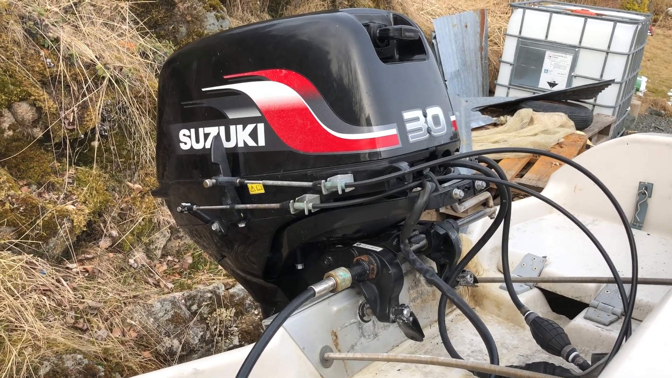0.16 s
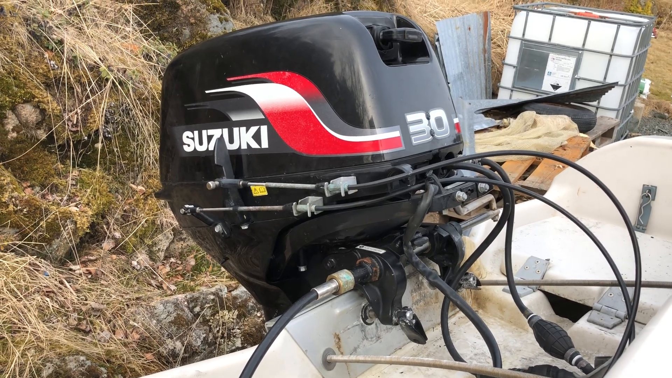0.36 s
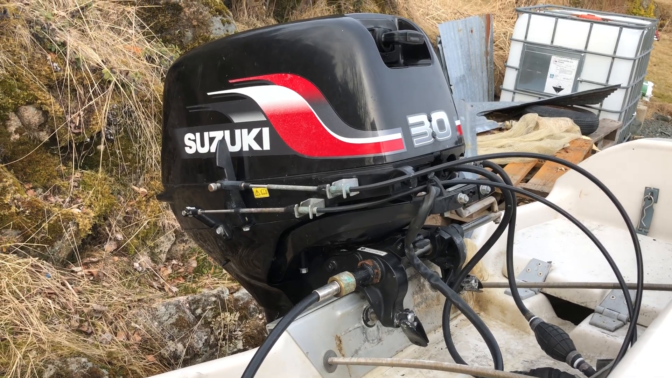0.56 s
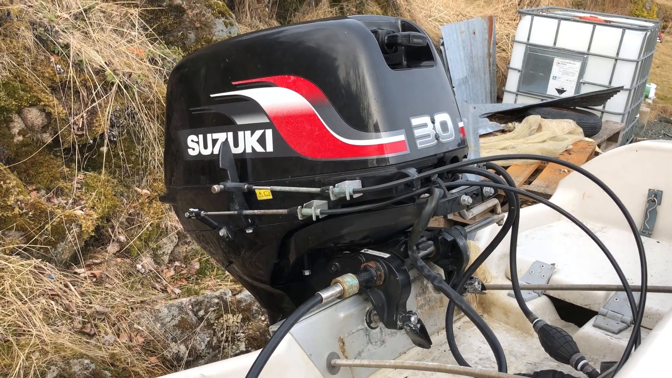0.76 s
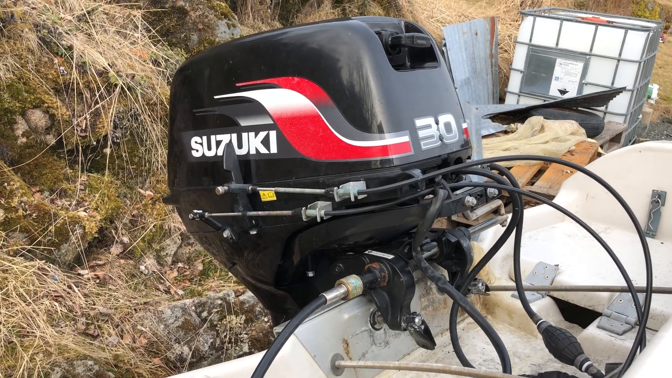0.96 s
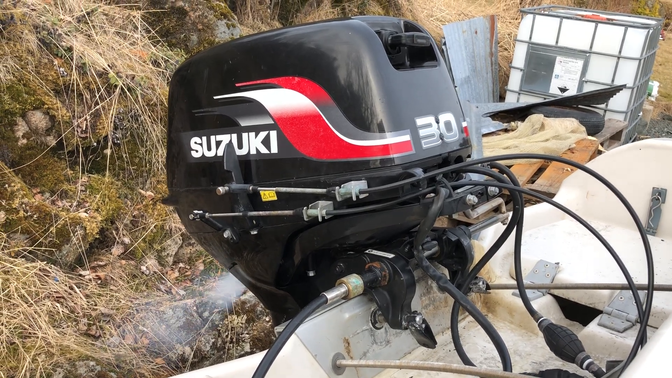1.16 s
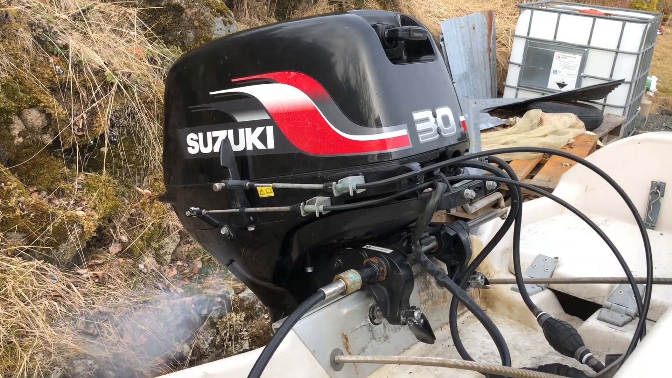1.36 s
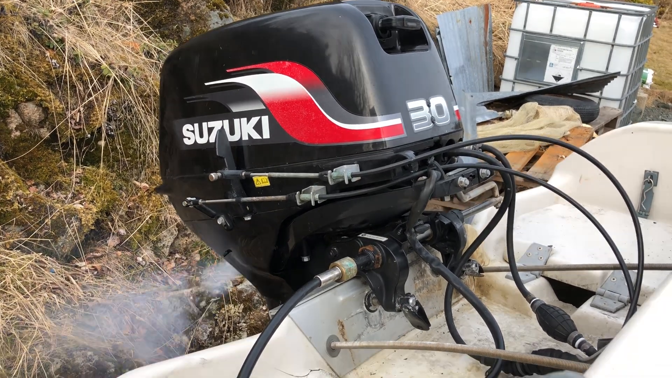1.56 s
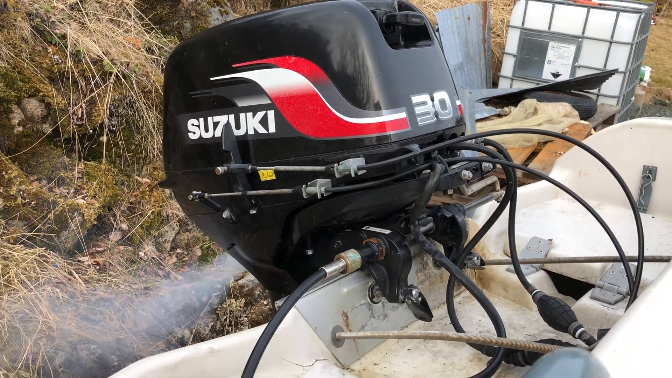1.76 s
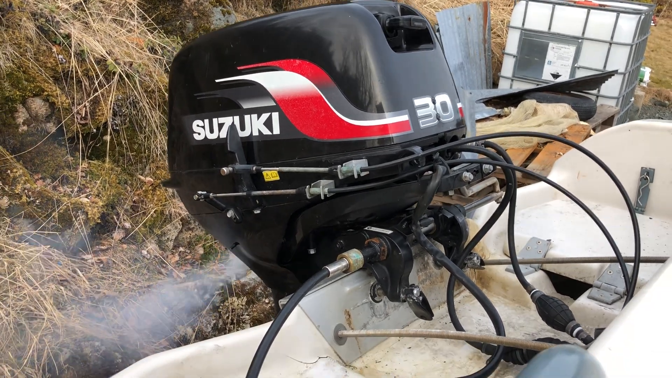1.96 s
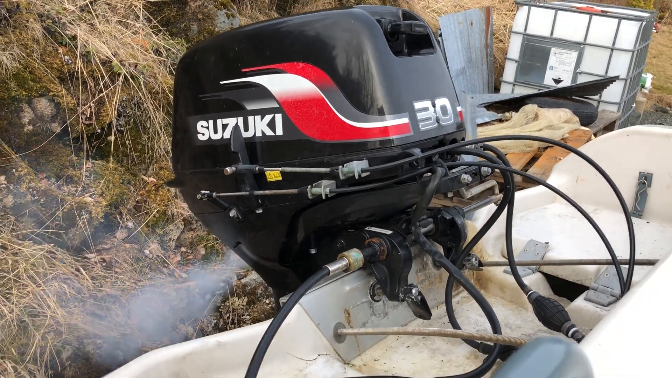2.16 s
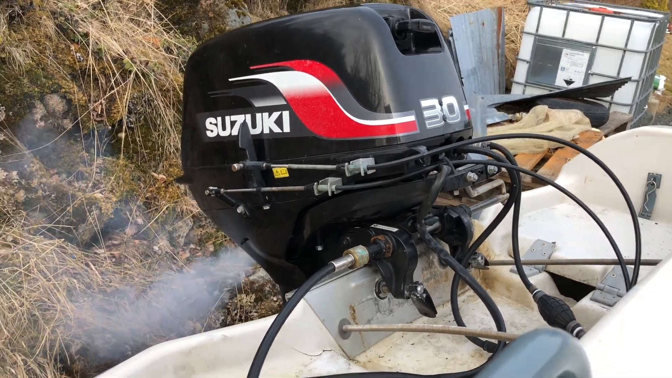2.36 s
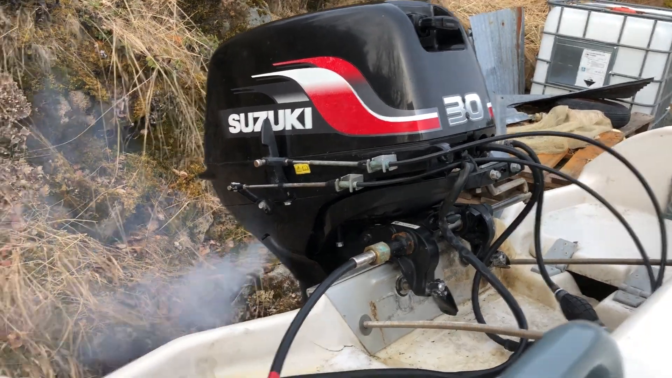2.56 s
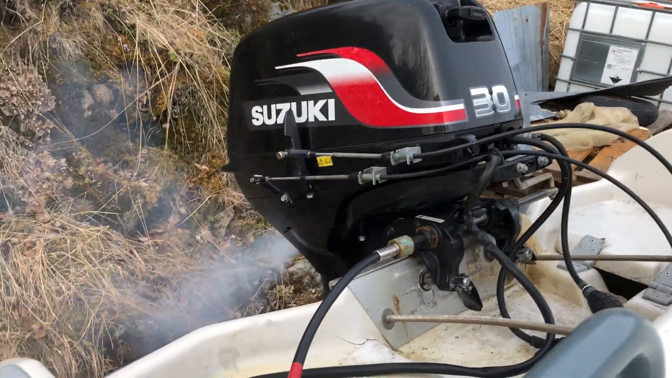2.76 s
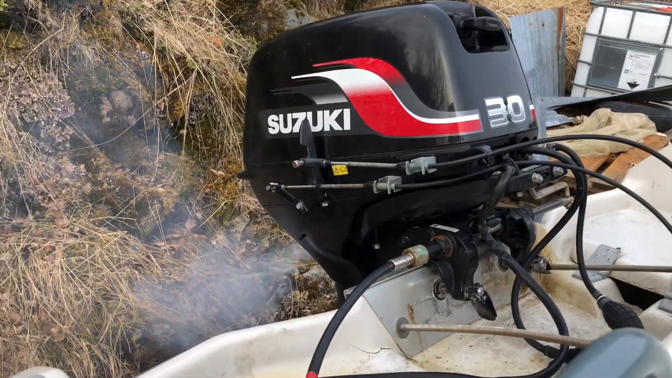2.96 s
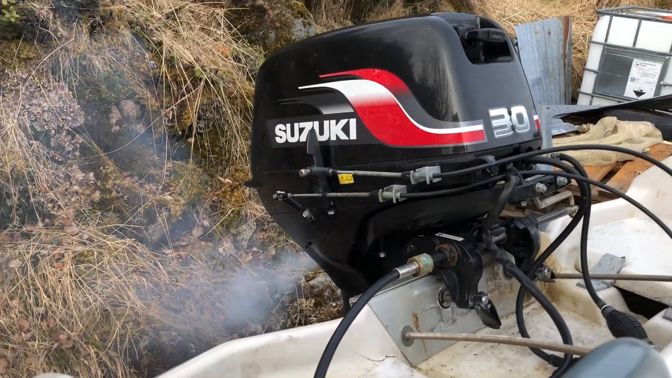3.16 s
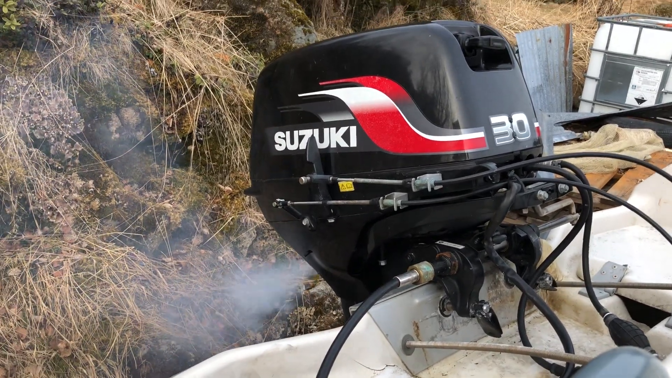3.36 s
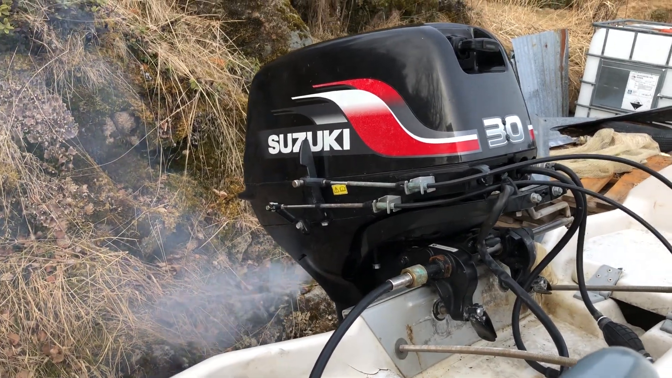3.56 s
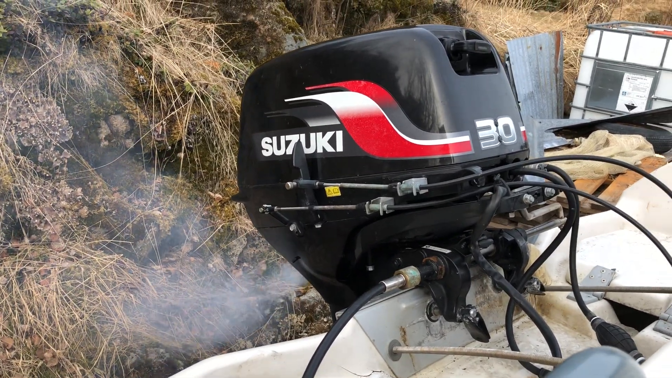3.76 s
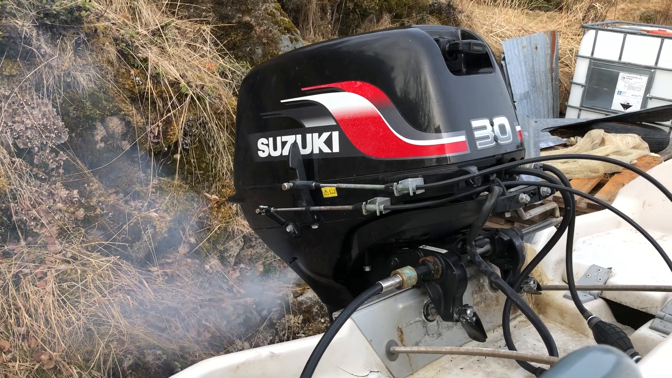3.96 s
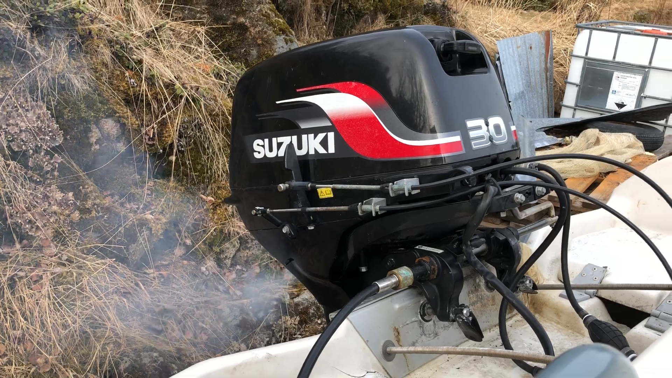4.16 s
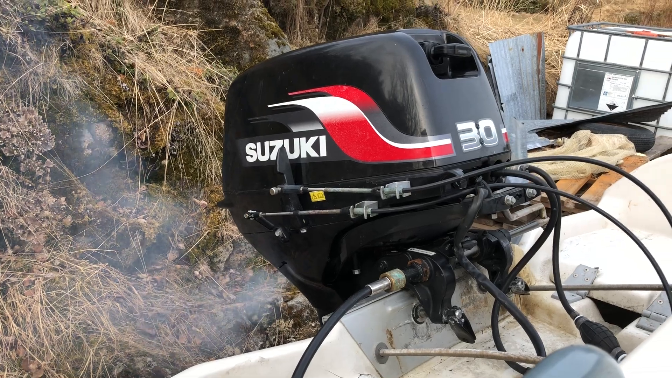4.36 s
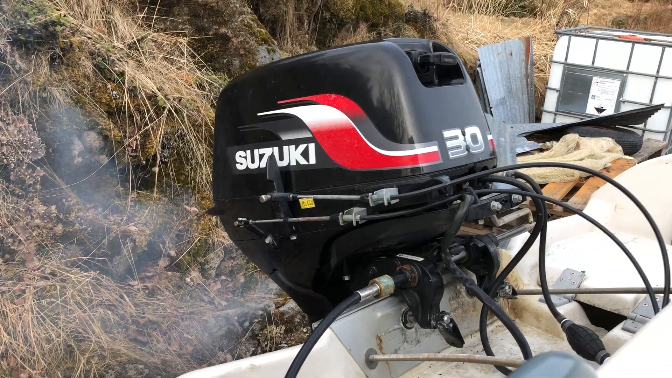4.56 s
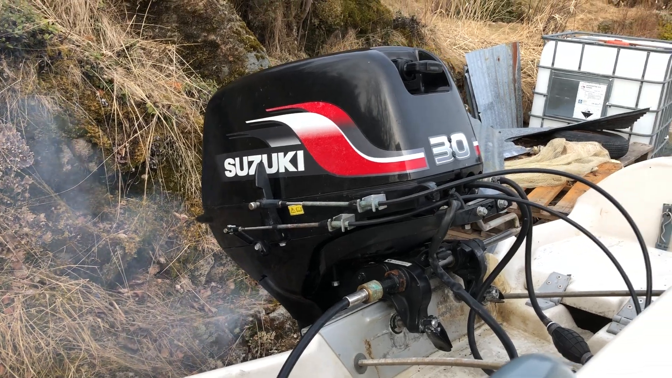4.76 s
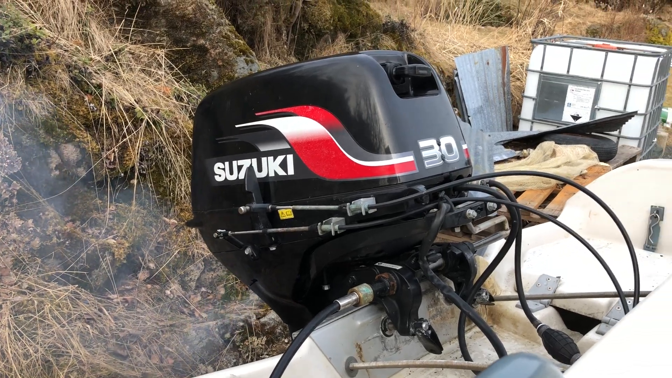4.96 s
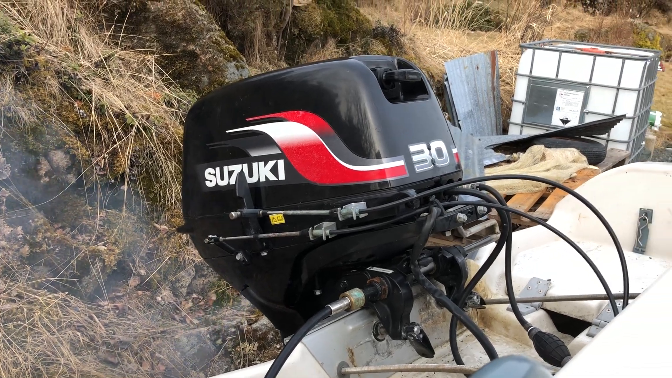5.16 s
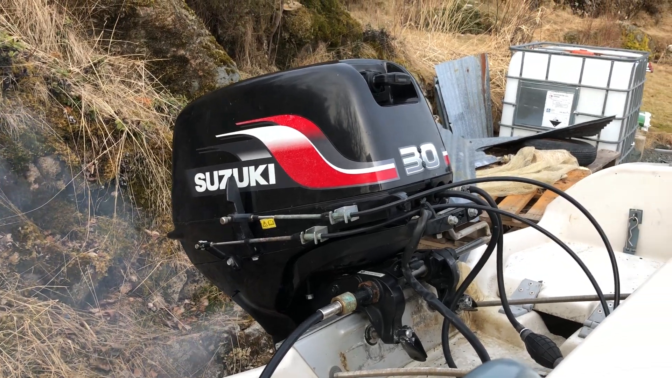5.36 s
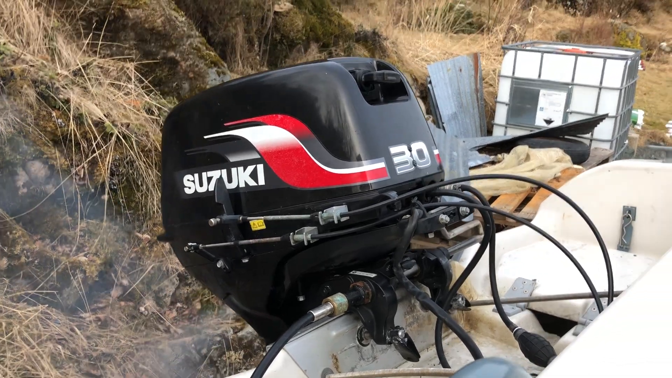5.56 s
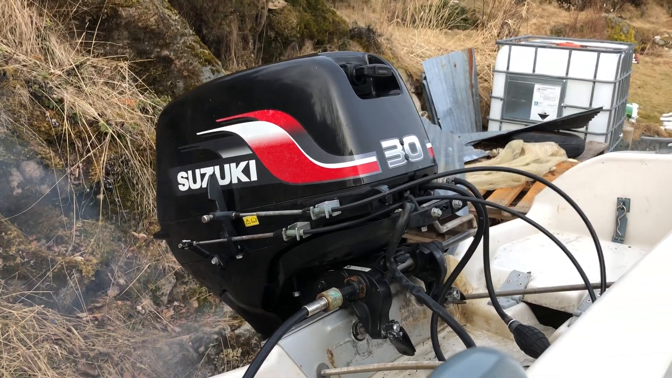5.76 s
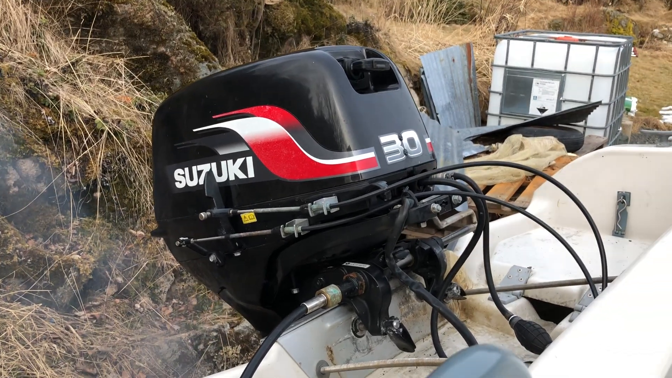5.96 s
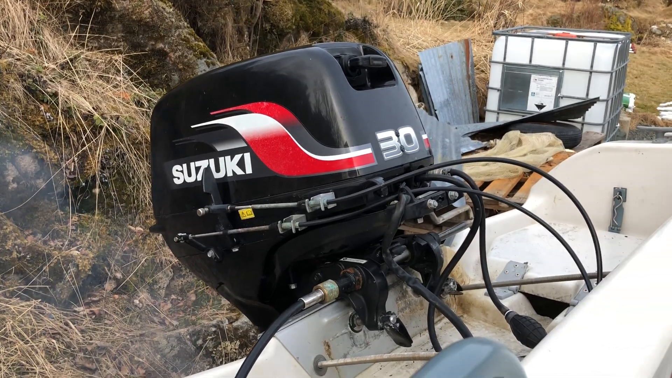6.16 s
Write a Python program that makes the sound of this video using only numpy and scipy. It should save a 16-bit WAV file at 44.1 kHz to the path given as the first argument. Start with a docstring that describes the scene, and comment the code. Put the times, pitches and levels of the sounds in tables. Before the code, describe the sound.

Close and nearly dry outdoors: rapid grinding starter strokes, about fourteen a second, the first one laboured. Then an uneven two-cylinder engine bursts in, clattering its casing and puffing through an open exhaust leg with a hollow tone near 210 hertz. It settles into weaker, steadier beats, misfires, slows with a few loose knocks and stops. A faint rising note follows in the near silence; no water, only soft air noise.

```python
"""An outboard motor on land fires unevenly: each firing rattles the casing and booms in the open exhaust leg.
First the starter grinds it through its compression strokes, gear teeth clacking and whining, until it catches.
Flywheel and gears hiss, slack parts knock, gas rumbles and pulses bounce along the leg. Later it misses
every other turn, slows and stalls with a faint ring of the flywheel; a faint rising note follows.
Hull and rock bank scatter the metal sounds briefly, over a quiet bed of air noise."""
import sys
import numpy as np
from scipy import signal
from scipy.fft import rfft, irfft, next_fast_len
from scipy.io import wavfile
from scipy.ndimage import uniform_filter1d, map_coordinates

SR = 44100
rng = np.random.default_rng(int(sys.argv[2]) if len(sys.argv) > 2 else 0)


def inscribe(sig):
    """Save sig as 16-bit PCM at rate SR to the path in sys.argv[1].

    A 1-D sig is mono; a 2-D sig holds one channel per row.
    Samples are clipped to [-1, 1] before scaling.
    """
    pcm = np.round(np.clip(np.atleast_2d(sig).T, -1, 1) * 32767)
    wavfile.write(sys.argv[1], SR, pcm.astype(np.int16))


N = 272979
TIME = np.arange(N) / SR
TOP_HZ = 15950  # band limit

# All levels are relative, before each source's own gain.
# air bed spectrum: freq_hz, density_db
AIR_SPECTRUM = [(18, -47.5), (30, -10), (114, 7.5), (294, -18), (484, -9.5), (582, -10), (2880, -25),
                (15900, -30.5)]

# ringing of the slowing flywheel: freq_hz, level_db
COAST_PARTIALS = [(828, -2), (990, -12), (539, -12.5), (1430, -16), (2182, -13), (4183, -21)]
# its level: time_s, level_db
COAST_LEVEL = [(5.2, -59), (5.5, -49.5), (5.85, -45.5), (5.93, -51), (6.03, -88)]

# hard knocks of slack parts: start_s, ring_db, ring_hz, crack_db
SLACK_KNOCKS = [(1.133, -22, 1830, -20.5), (2.578, -21, 1470, -28.5), (2.585, -17, 1443, -33),
                (2.617, -19, 5120, -30), (2.752, -22, 5070, -44), (5.256, -39, 3220, -34.5),
                (5.323, -30, 3006, -30.5), (5.688, -29, 2880, -29), (5.815, -35, 1460, -45.5)]
# knock crack spectrum: freq_hz, density_db
CRACK_SPECTRUM = [(300, -16), (1400, 0.5), (2700, 4.5), (5000, -1.5), (8000, -10.5), (16000, -31.5)]

# load over one compression stroke: stroke_share, mesh_hz, whine_db, grind_db
STROKE_LOAD = [(0, 570, -23, -0.5), (.2, 548, -11, 1), (.35, 524, -1.5, -0.5), (.46, 486, 3.5, 3.5),
               (.54, 440, -3.5, 1.5), (.66, 440, -16.5, -1.5), (.85, 549.7, -33, -2.5), (1, 570, -31.5, -4)]
# whine partials: mesh_multiple, level_db
MESH_PARTIALS = [(1, -3.5), (2, 0.5), (3, -10.5), (4, -14), (6, -8.5), (8, -10.5), (12, -18)]
# starter drive: time_s, drive_db
STARTER_DRIVE = [(0, -1), (.15, -1.5), (1.09, -1.5), (1.15, 2), (1.2, -3.5), (1.3, -85.5)]
# pinion and flywheel resonances: freq_hz, width_hz, lift_db
FLYWHEEL_MODES = [(545, 16.8, 10), (1322, 20, 9.5), (1736, 28, 12), (2575, 90, 9), (3266, 58, 11),
                  (3900, 60, 6), (4250, 70, 8), (6080, 50, 10), (6540, 113, 15), (8490, 70, 14.5),
                  (9330, 70, 14), (10700, 140, 12.5)]
# tooth scrape spectrum: freq_hz, density_db
GRIND_SPECTRUM = [(25, -38), (45, -10), (90, -10.5), (160, -6), (240, -1.5), (420, -7), (560, -8),
                  (800, -9), (1100, -13.5), (2200, -17), (3300, -17), (5100, -24), (6500, -25.5),
                  (11000, -39.5), (15900, -43.5)]
# tooth strike and clack spectrum: freq_hz, density_db
CLACK_SPECTRUM = [(300, -6), (1200, -20), (2400, -3.5), (3300, 2), (4200, -2.5), (5000, -4.5),
                  (6500, -16.5), (10000, -25.5), (16000, -39.5)]
# pinion ring: freq_hz, level_db, t60_s
PINION_MODES = [(3344, -5, 0.085), (3860, -10, 0.075), (2585, -14, 0.051), (681, -9, 0.061),
                (6100, -11.5, 0.0485), (7000, -15.5, 0.025), (9340, -18, 0.074)]
# spectrum of air squeezed by the piston: freq_hz, density_db
HISS_SPECTRUM = [(1000, -26), (5000, -2), (9000, 0.5), (16000, -8.5)]
# starter motor hum: freq_hz, level_db
ARMATURE_HUM = [(546, -41.5), (1030, -55), (1708, -53), (6471, -54)]

# spinning parts: time_s, level_db
WHIR_LEVEL = [(1.0, -65), (1.075, -34), (2.6, -33), (3.2, -36), (4.5, -37), (5.4, -40.5), (5.65, -42),
              (5.87, -54.5), (6.05, -84)]
# spinning parts spectrum: freq_hz, density_db
SPIN_SPECTRUM = [(100, -25.5), (400, -2), (760, -8.5), (1300, -5), (2800, -5.5), (4600, -13.5),
                 (6500, -5.5), (7300, -18.5), (10400, -10.5), (11500, -22), (16000, -18)]
# block and cowling resonances: freq_hz, width_hz, lift_db
CASING_MODES = [(435, 78.5, -0.5), (670, 17.4, 7), (858, 64.5, 9), (969, 87, 6.5), (1371, 120, 5.5),
                (1912, 42.4, 2.5), (2060, 32, -4.5), (2168, 60, 3.5), (2330, 61.7, -0.5), (2673, 28.9, 1.5),
                (3210, 39, 2), (4270, 15, 3.5), (5140, 67, 4.5), (5500, 140, 1.5), (5990, 38, 4),
                (6440, 33.4, 3.5), (6750, 16, 2.5), (9540, 240, -1.5)]
# clatter spectrum: freq_hz, density_db
CLATTER_SPECTRUM = [(100, -28), (300, 1.5), (500, 6), (760, -10), (1200, -11.5), (2300, 0), (3700, -6),
                    (5500, -4), (7200, -11), (10000, -10), (11800, -16.5), (16000, -17.5)]

# gas flow: time_s, rumble_db, hollow_db
GAS_FLOW = [(1.15, -28, -29.5), (2.0, -27.5, -28), (2.9, -27, -28), (3.5, -35.5, -36.5),
            (4.2, -31.5, -35.5), (5.3, -38, -49), (5.65, -42.5, -55), (5.8, -45, -43), (6.02, -66, -73),
            (6.19, -78, -70.5)]
# gas rumble spectrum: freq_hz, density_db
RUMBLE_SPECTRUM = [(15, -36), (28, -17), (43, -8), (80, -2), (150, -3.5), (250, -5), (400, -26.5),
                   (1000, -78)]
# hollow rush spectrum: freq_hz, density_db
HOLLOW_SPECTRUM = [(150, -3), (270, -3), (360, -6.5), (430, -5), (490, 0.5), (560, -11.5), (720, -15),
                   (1500, -41.5)]
# leg hum between puffs: time_s, level_db
LEG_HUM = [(1.1, -42), (2.9, -28), (3.3, -35.5), (4.2, -32), (5.28, -37.5), (5.42, -29.5), (5.65, -40),
           (5.85, -51), (6.05, -76)]
# low sway of leg and transom: freq_hz, level_db, t60_s
SWAY_MODES = [(45, -5.5, 0.18), (65.6, -6, .18), (84, -3.5, .16), (118.8, -6, .14), (146, -1, 0.11),
              (284, -5.5, .09)]

# uneven firings, catch to last kick: start_s, clatter_db, boom_db, puff_rise_s, boom_hz (before drift)
FIRING_EVENTS = [(1.087, -26, -45, .02, 214), (1.119, -18.5, -23, .036, 215),
                 (1.181, -27.5, -9.5, 0.031, 218.8), (1.245, -46.5, -12, 0.03, 207.4),
                 (1.275, -24, -11.5, 0.038, 204), (1.388, -22, -9.5, 0.038, 215.5),
                 (1.479, -28, -11.5, 0.024, 206.5), (1.557, -21, -16.5, .035, 226),
                 (1.699, -22, -17.5, 0.059, 209.7), (1.807, -25.5, -19, 0.023, 210.6),
                 (1.875, -20, -13.5, 0.026, 215), (1.988, -21.5, -11.5, 0.041, 205),
                 (2.072, -26.5, -13, 0.015, 214.6), (2.16, -21.5, -10.5, 0.043, 203.9),
                 (2.244, -27, -8.5, 0.02, 210.8), (2.304, -24, -14, 0.032, 204),
                 (2.372, -31.5, -18.5, 0.016, 204.8), (2.394, -28.5, -16, 0.039, 213.2),
                 (2.479, -24.5, -11.5, 0.041, 200.4), (2.546, -36, -12.5, 0.02, 210.7),
                 (2.613, -25.5, -11.5, 0.021, 197.3), (2.678, -34, -34, 0.029, 204.1),
                 (2.749, -22.5, -12, 0.03, 209), (2.815, -34.5, -14.5, .021, 200),
                 (2.898, -22, -9, 0.034, 215.5), (2.958, -36, -15.5, .024, 202),
                 (2.992, -26, -10.5, 0.037, 210.6), (3.093, -25, -18.5, 0.032, 205.8),
                 (3.207, -25, -17.5, 0.029, 215), (3.323, -25, -19.5, 0.028, 208),
                 (3.443, -26, -18, 0.026, 208.8), (3.506, -40.5, -32, .026, 210),
                 (3.565, -26, -18.5, .027, 204), (3.688, -25, -17.5, 0.027, 208),
                 (3.75, -35.5, -26, .022, 211.2), (3.812, -27.5, -15.5, 0.021, 200),
                 (3.875, -36, -19.5, .019, 207), (3.937, -28.5, -16.5, 0.019, 202.8),
                 (4, -35.5, -16, 0.014, 203), (4.06, -29.5, -21.5, .022, 195),
                 (4.124, -31, -16.5, 0.021, 206.5), (4.188, -30, -18.5, .025, 203),
                 (4.254, -30.5, -21, 0.021, 208), (4.318, -33, -27, 0.018, 215),
                 (4.388, -31.5, -20.5, 0.022, 222), (4.458, -31.5, -22.5, 0.026, 207),
                 (4.528, -31, -19.5, 0.03, 205), (4.605, -35.5, -44, 0.023, 204),
                 (4.683, -29, -28, .024, 208), (4.76, -32.5, -32, .022, 200),
                 (4.846, -30.5, -28, .028, 199.3), (4.931, -31.5, -27.5, 0.024, 197.2),
                 (5.02, -32, -26.5, 0.026, 202.5), (5.11, -32, -29, 0.027, 195),
                 (5.207, -35, -28.5, 0.033, 199.6), (5.318, -33.5, -27, .034, 214),
                 (5.44, -32, -30, .02, 213), (5.561, -33, -32, 0.022, 214.2), (5.688, -39, -49, .026, 215),
                 (5.835, -49.5, -50, 0.017, 253.3)]
# weak strokes between firings: time_s, clatter_db, boom_db
WEAK_LEVELS = [(1.2, -48, -20), (2.5, -45, -25), (3.3, -38.5, -37), (4.7, -38, -46), (5.05, -39.5, -36),
               (5.26, -39, -34), (5.38, -36.5, -24.5), (5.5, -36.5, -25), (5.63, -40, -25.5),
               (5.76, -52.5, -39)]
# rattles lengthen as the crank slows: time_s, stretch_ratio
RATTLE_STRETCH = [(3.0, 1.1), (3.3, 0.99), (4.25, 1.206), (5.05, 1.49), (5.4, 1.67), (5.7, 1.9)]

# cranking: stroke time at full speed, extra time taken at the slow start
CRANK_START_S, STROKE_S, LABOUR_S = 0.0016, 0.0711, 0.028
# gear clack: at full speed, added while slow, random spread
CLACK_DB, SLOW_CLACK_DB, CLACK_VARY_DB = -13.5, -3, 1.3
# rattle length before stretch; second rattle's delay, its level at the reference push, rise with a longer push
RATTLE_S, SECOND_S, SECOND_DB, SECOND_DB_PER_S = 0.018, 0.023, -10.5, 601
# reference puff rise time; puff half length as a share of its own rise time
PUFF_S, PUFF_WIDTH = 0.028, 0.535


def amp(db):
    """dB to amplitude."""
    return 10 ** (np.asarray(db) / 20)


def unit(x):
    """Scale to RMS 1."""
    return x / np.sqrt(np.mean(x ** 2) + 1e-20)


def curves(rows, at=TIME):
    """Each column after the first, joined by straight lines."""
    s, *cols = np.transpose(rows)
    return [np.interp(at, s, c) for c in cols]


def wobble(rate_hz):
    """Smooth random curve, rate_hz knots a second."""
    knots = rng.standard_normal(int(N * rate_hz / SR) + 4)
    fine = np.linspace(0, len(knots) - 1, 6 * len(knots))
    return np.interp(TIME * rate_hz, fine, map_coordinates(knots, [fine]))


def turning(hz):
    """Phase of a moving pitch."""
    return 2 * np.pi * np.cumsum(hz) / SR


def body(x, spectrum, modes=(), size=8192):
    """Minimum-phase filter of energy 1: a broad spectrum lifted by resonances."""
    hz = np.fft.rfftfreq(size, 1 / SR)
    f, level = np.transpose(spectrum)
    db = np.interp(np.log(hz + 1), np.log(f + 1), level)
    for centre, width, lift in modes:
        db = db + lift / (1 + ((hz - centre) / width) ** 2)
    # folding the cepstrum makes the response causal
    cepstrum = irfft(np.log(amp(db) + 1e-6))
    cepstrum[1:size // 2] *= 2
    cepstrum[size // 2 + 1:] = 0
    response = irfft(np.exp(rfft(cepstrum)))
    return signal.fftconvolve(x, response / np.linalg.norm(response))[:N]


def grit(rate_hz, share):
    """Random metal contacts over noise; share is the contacts' part of the power."""
    hits = rng.random(N) < rate_hz / SR
    contacts = hits * rng.choice([-1, 1], N) * (.5 + rng.random(N))
    share = np.clip(share, 0, 1)
    return np.sqrt(share) * unit(contacts) + np.sqrt(1 - share) * rng.standard_normal(N)


def ragged(x, depth_db, size=4):
    """Each contact wakes other partials: short patches of the spectrum stand out or drop away."""
    z = signal.stft(x, nperseg=256)[2]
    field = rng.standard_normal(z.shape)
    for axis in (0, 1):
        field = uniform_filter1d(field, size, axis)
    patches = unit(amp(depth_db * unit(field)))
    return signal.istft(z * patches, nperseg=256)[1][:N]


def place(shape, s):
    """Silence with the shape starting at s."""
    return np.pad(shape, (max(round(s * SR), 0), N))[:N]


def burst(s, length_s, attack_s):
    """A quick rise at s, a short hold and a fall."""
    u = TIME[:SR // 4]
    rise = 1 - np.exp(-u / attack_s)
    return place(rise * np.exp(-np.minimum(u / length_s, 10) ** 2), s)


def bump(s, half_s, fall_s=None):
    """A smooth swell that tops at s, with its own fall time if given."""
    first = max(round(s * SR) - SR // 8, 0)
    u = TIME[first:first + SR // 4] - s
    width_s = np.where(u < 0, half_s, fall_s or half_s)
    return np.pad(np.exp(-np.minimum(abs(u) / width_s, 10) ** 2), (first, N))[:N]


def knock(s, modes, crack_db=-8, attack_s=0.00084):
    """Damped modes and a short noise crack, from s on."""
    u = np.maximum(TIME[:SR // 5] - s % (1 / SR), 0)
    ring = 0
    for hz, db, t60_s in modes:
        decay = amp(db + rng.normal(0, 0.8) - 60 * u / t60_s)
        ring = ring + decay * np.sin(2 * np.pi * hz * u)
    dull_noise = signal.lfilter([.5], [1, -.5], rng.standard_normal(len(u)))
    crack = amp(crack_db - 60 * u / 0.046) * dull_noise
    return place((ring + crack) * (1 - np.exp(-u / attack_s)), s)


def air_bed(level_db=-66.0):
    """Steady noise shaped to a broad, mostly low spectrum."""
    return amp(level_db) * body(rng.standard_normal(N), AIR_SPECTRUM)


def surroundings(x, wet_db=-13, t60_s=0.11):
    """Short, dull scatter from the hull and the bank."""
    t = TIME[:SR // 3]
    tail = rng.standard_normal(len(t)) * amp(-60 * t / t60_s) * (t > .003)
    tail = signal.lfilter([1], [1, -.5], tail)
    return amp(wet_db) * signal.fftconvolve(x, tail / np.linalg.norm(tail))[:N]


def last_note(start_s=6.13, level_db=-58, hz=500, rise_per_s2=70):
    """A faint rising note in the stillness after the stall."""
    pitch_hz = hz * (1 + rise_per_s2 * np.maximum(TIME - start_s, 0) ** 2)
    level = amp(level_db + 2 * wobble(150)) * burst(start_s, 0.036, attack_s=0.0051)
    return level * np.sin(turning(pitch_hz))


def coast(blows, level_db=-2.0, between=0.64, swell_s=0.016):
    """Flywheel partials sing at each stroke while it slows."""
    ring = 0
    for hz, db in COAST_PARTIALS:
        level = amp(db + 2.6 * wobble(45))
        ring = ring + level * np.sin(turning(hz + 13 * wobble(130)))
    swells = between + sum(bump(s, swell_s) for s, _, _ in blows)
    fade_in = np.clip((TIME - 5.2) / 0.13, 0, 1)
    return fade_in * amp(curves(COAST_LEVEL)[0] + level_db) * swells * ring


def knocks(t60_s=0.019, crack_s=0.0063):
    """A slack part hits hard: a dry crack in the casing and a short ring of its own."""
    rings, force = np.zeros(N), np.zeros(N)
    for s, ring_db, hz, crack_db in SLACK_KNOCKS:
        rings += amp(ring_db) * knock(s, [(hz, 0, t60_s)], crack_db=-19.0)
        force += amp(crack_db) * burst(s, crack_s, attack_s=0.00099)
    return rings + body(force * rng.standard_normal(N), CRACK_SPECTRUM, CASING_MODES)


def cranking(count=15):
    """Compression strokes as the starter comes up to speed; rows: start_s, clack_db."""
    k = np.arange(count)
    slow = np.exp(-k)
    start_s = CRANK_START_S + STROKE_S * k + LABOUR_S * (1 - slow)
    clack_db = CLACK_DB + SLOW_CLACK_DB * np.sqrt(slow) + CLACK_VARY_DB * rng.standard_normal(count)
    return np.transpose([start_s, clack_db])


def chuffs(strokes, level_db=-32, hz=228, drop=0.5, drop_s=0.006, length_s=0.035, attack_s=0.0071):
    """Each cranked stroke pumps a soft puff of falling pitch down the exhaust leg."""
    total = np.zeros(N)
    for s, _ in strokes:
        fall = 1 + drop * np.exp(-np.clip((TIME - s) / drop_s, 0, 20))
        pitch_hz = hz * np.exp(rng.normal(0, 0.04)) * fall
        level = amp(level_db + rng.normal(0, 1.4)) * burst(s, length_s, attack_s)
        total += level * np.sin(turning(pitch_hz))
    return total


def gear_whine(teeth, load_db, labour):
    """Harmonics of the tooth rate flare as they sweep through the flywheel's resonances."""
    whine = 0
    for k, db in MESH_PARTIALS:
        level = amp(db + 2.4 * wobble(69.9) - 13 * labour * (k - 1))
        whine = whine + level * np.sin(round(k) * teeth + 0.1 * (k - 1) * wobble(220))
    return body(amp(load_db) * whine, [(TOP_HZ, 0)], FLYWHEEL_MODES)


def armature_hum():
    """The starter motor's own tones, wavering in level and pitch."""
    hum = 0
    for hz, db in ARMATURE_HUM:
        level = amp(db + 2.2 * wobble(30))
        hum = hum + level * np.sin(turning(hz + 6 * wobble(25)))
    return hum


def starter(strokes, grind_db=-31, whine_db=-27, teeth_db=-37, clack_db=-18, clack_s=0.039,
            ring_db=-6.0, hiss_db=-44):
    """The teeth clack as they take up the load; each compression drags the whine down."""
    starts = strokes[:, 0]
    stroke = np.interp(TIME, [*starts, starts[-1] + STROKE_S], np.arange(len(starts) + 1)) % 1
    mesh_hz, load_db, scrape_db = curves(STROKE_LOAD, stroke)
    # the starter labours through the first, slowest compression
    labour = np.exp(-((TIME - .068) / .035) ** 2)
    run_up = 1 - .25 * labour
    load_db = load_db * (1 - 0.8 * labour)
    teeth = turning(mesh_hz * run_up * (1 + .008 * wobble(60)))
    whine = gear_whine(teeth, load_db, labour)
    # every tooth strikes once, harder under load, then scrapes as it rolls through the mesh
    tooth_steps = unit(np.diff(teeth // (2 * np.pi), prepend=0))
    strikes = tooth_steps * amp(teeth_db + .5 * load_db + 2.5 * wobble(400))
    scrape = grit(rate_hz=1500, share=0.4) * (1 + .5 * np.cos(teeth))
    scrape = scrape * amp(grind_db + scrape_db + wobble(70.0))
    clacks, pinion = np.zeros(N), np.zeros(N)
    for s, db in strokes:
        clacks += amp(db + clack_db) * burst(s, clack_s, attack_s=0.0011)
        pinion += amp(db + ring_db) * knock(s, PINION_MODES)
    impacts = strikes + clacks * grit(rate_hz=3000, share=0.12)
    metal = body(scrape, GRIND_SPECTRUM, FLYWHEEL_MODES) + body(impacts, CLACK_SPECTRUM, FLYWHEEL_MODES)
    # hiss swells with the compression
    hiss = amp(hiss_db) * stroke ** 2 * body(rng.standard_normal(N), HISS_SPECTRUM)
    drive = amp(curves(STARTER_DRIVE)[0])
    return drive * (metal + pinion + hiss + amp(whine_db) * whine + armature_hum())


def whir(level_db=-3.5, flutter_db=0.7, tick_db=-3, tick_vary_db=2.5, tick_t60_s=0.054, count=240):
    """Flywheel, bearings and gears hiss; loose linkage ticks at random, each on one casing mode."""
    level = amp(curves(WHIR_LEVEL)[0] + level_db + flutter_db * wobble(65))
    ticks = np.zeros(N)
    for when, which, size in rng.random((count, 3)):
        hz = CASING_MODES[int(which * len(CASING_MODES))][0]
        size_db = tick_db - tick_vary_db * np.log(size + 1e-2)
        ticks += amp(size_db) * knock(when * N / SR, [(hz, 0, tick_t60_s)], crack_db=-13.5)
    spin = body(grit(rate_hz=450, share=0.22), SPIN_SPECTRUM, CASING_MODES)
    return level * (ragged(spin, depth_db=2.0) + ticks)


def lulls(blows, depth=0.17, lead=0.33, width=0.13, growth=3.5):
    """Gain of the moving parts: compression slows the crank before each blow, more for longer blows."""
    dips = 0
    for s, _, length_s in blows:
        dip = depth * (length_s / RATTLE_S) ** growth
        dips = dips + dip * bump(s - lead * length_s, width * length_s)
    return 1 - np.minimum(dips, .85)


def weak_strokes(push_s=0.02075, half_s=0.015, vary_db=2.2):
    """Halfway between two firings the other cylinder gives its own rattle and puff."""
    starts = np.transpose(FIRING_EVENTS)[0]
    blows, booms = [], []
    for s in (starts[:-1] + starts[1:]) / 2:
        clatter_db, boom_db = curves(WEAK_LEVELS, s) + vary_db * rng.standard_normal(2)
        blows.append((s, clatter_db, RATTLE_S * curves(RATTLE_STRETCH, s)[0]))
        booms.append((s + push_s, boom_db, half_s))
    return blows, booms


def firing(second_length_s=0.014, shared_db=-1.6):
    """Each firing gives a rattle, a second short rattle soon after (stronger after a long push) and a puff."""
    blows, booms = [], []
    for s, clatter_db, boom_db, push_s, _ in FIRING_EVENTS:
        second_db = min(SECOND_DB + SECOND_DB_PER_S * (push_s - PUFF_S), 0)
        first_db = clatter_db + shared_db * amp(second_db)  # a strong second rattle softens the first
        blows.append((s, first_db, RATTLE_S * curves(RATTLE_STRETCH, s)[0]))
        blows.append((s + SECOND_S, clatter_db + second_db, second_length_s))
        booms.append((s + push_s, boom_db, PUFF_WIDTH * push_s))
    return blows, booms


def clatter(blows, level_db=-2, attack_s=0.0024, ring_db=-22.0, vary_db=5):
    """Each blow rattles the slack drive parts against the casing, whose modes waver in level and pitch."""
    force = sum(amp(db + level_db) * burst(s, length_s, attack_s) for s, db, length_s in blows)
    contacts = force * grit(rate_hz=2400, share=0.45) * amp(0.93 * wobble(250))
    rattle = body(contacts, CLATTER_SPECTRUM, CASING_MODES)
    modes = 0
    for hz, width, lift in CASING_MODES:
        level = amp(lift + vary_db * wobble(22))
        modes = modes + level * np.sin(turning(hz + 0.398 * width * wobble(90)))
    return ragged(rattle, depth_db=3.0) + amp(ring_db) * force * modes


def barks(blows, level_db=8, follow=0.34, follow_flow=0.65, hz=480, t60_s=0.039, bounce_s=.0155,
          loss_db=-5.0, count=3):
    """Each blow sends a pressure pulse bouncing along the exhaust leg, harder with more gas flow."""
    total = np.zeros(N)
    for s, db, _ in blows:
        pulse_db = level_db + follow * db + follow_flow * curves(GAS_FLOW, s)[1]
        for k in range(count):
            mode = (hz * np.exp(rng.normal(0, 0.074)), 0, t60_s)
            bark = knock(s + k * bounce_s, [mode], crack_db=-25, attack_s=0.0022)
            total += amp(pulse_db + loss_db * k) * bark
    return total


def leg_boom(swell, overtone_db=-24, rough=0.06):
    """Resonance of the hollow leg with a weak octave; the pitch climbs through each puff."""
    leg_hz, = curves([(s + push_s, hz) for s, _, _, push_s, hz in FIRING_EVENTS])
    growth = np.gradient(uniform_filter1d(np.log(swell), size=SR // 100)) * SR
    phase = turning(leg_hz * (1 + 0.0327 * wobble(70) - 0.029 * np.tanh(growth / 50)))
    tone = np.sin(phase) + amp(overtone_db) * np.sin(2 * phase)
    return swell * (1 + rough * wobble(160)) * tone


def exhaust(booms, rumble_db=-2.5, hollow_db=-5.5, thump_db=2, thump_follow=0.35, follow=0.31,
            rise=0.8, fall=1.21):
    """Each puff swells the hollow leg's resonance; the gas rumbles and rushes out with it."""
    puffs = sum((amp(db) * bump(s, rise * half_s, fall * half_s)) ** 2 for s, db, half_s in booms)
    hum = amp(curves(LEG_HUM)[0] + 1 + 3.4 * wobble(50))
    swell = np.sqrt(puffs + hum ** 2)
    boom = leg_boom(swell)
    # each puff also shoves the air once, and the flow surges with it
    loudest_db = max(db for _, db, _ in booms)
    thumps = np.zeros(N)
    for s, db, half_s in booms:
        shove_db = thump_db + thump_follow * (db - loudest_db)
        thumps += amp(shove_db) * knock(s - half_s / 2, SWAY_MODES, crack_db=-62.5, attack_s=0.0071)
    local_mean = uniform_filter1d(swell, size=SR // 4)
    surge = ((swell + 0.045) / (local_mean + 0.0062)) ** follow
    low_db, mid_db = curves(GAS_FLOW)
    rumble = amp(rumble_db) * body(rng.standard_normal(N), RUMBLE_SPECTRUM)  # unsteady gas flow
    hollow_level = amp(mid_db + hollow_db + 3.66 * wobble(55))
    hollow = hollow_level * body(rng.standard_normal(N), HOLLOW_SPECTRUM)
    running = np.clip((TIME - 1.1) / 0.095, 0, 1)
    return running * (boom + amp(low_db) * (thumps + surge * rumble) + surge * hollow)


def scene():
    """Sums all sources; blows: start_s, level_db, length_s; booms: top_s, level_db, half_s."""
    strokes = cranking()
    strong_blows, strong_booms = firing()
    weak_blows, weak_booms = weak_strokes()
    blows = strong_blows + weak_blows
    booms = strong_booms + weak_booms
    moving_parts = lulls(blows) * (clatter(blows) + whir())
    metal = starter(strokes) + moving_parts + knocks() + coast(blows)
    gas = chuffs(strokes) + exhaust(booms) + barks(blows)
    return (air_bed() + surroundings(metal) + last_note() + metal + gas)[None]


def record(dry, low_cut_hz=38):
    """High-pass against the deepest bass, then a sharp cut at the band limit."""
    high_pass = signal.butter(4, low_cut_hz, "high", fs=SR, output="sos")
    thinned = signal.sosfilt(high_pass, dry)
    m = next_fast_len(N + SR // 2)
    in_band = np.fft.rfftfreq(m, 1 / SR) < TOP_HZ
    return irfft(rfft(thinned, m) * in_band, m)[..., :N]


dry = scene()
out = record(dry)
inscribe(out)
```